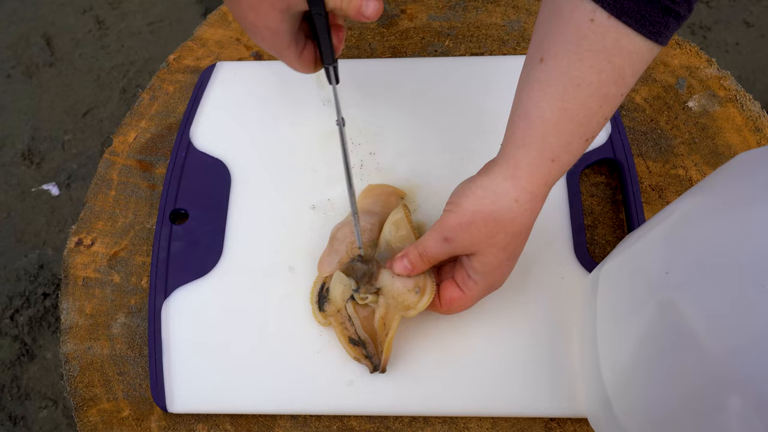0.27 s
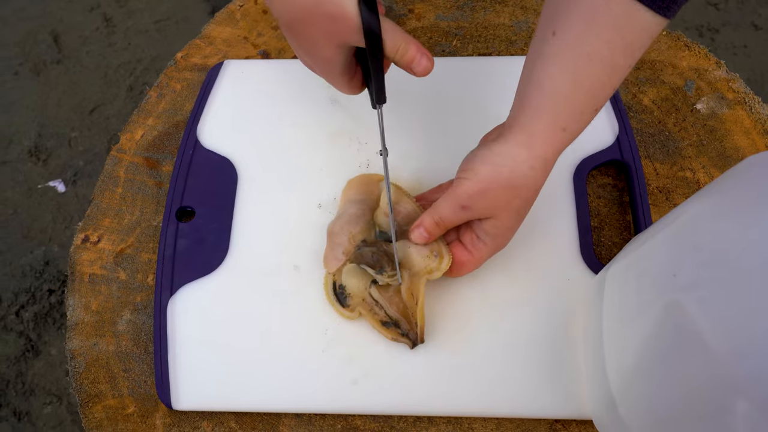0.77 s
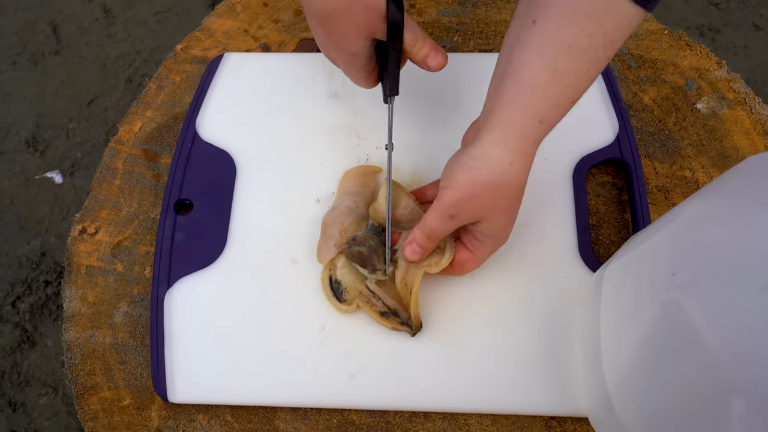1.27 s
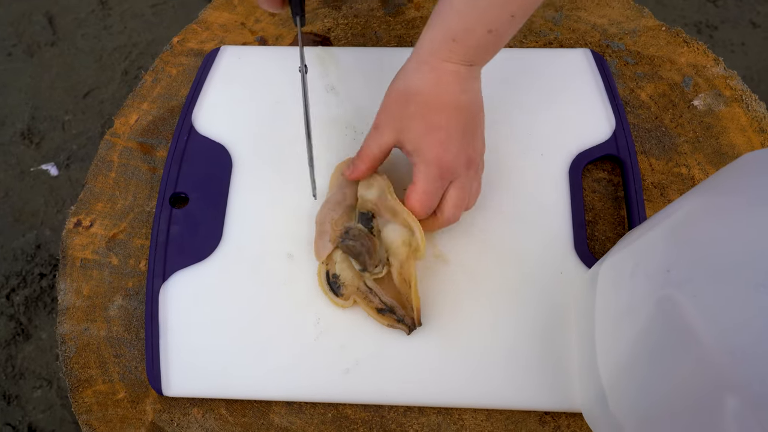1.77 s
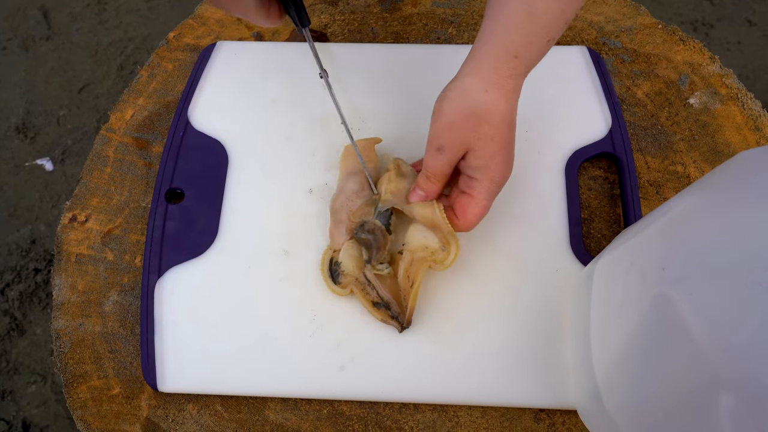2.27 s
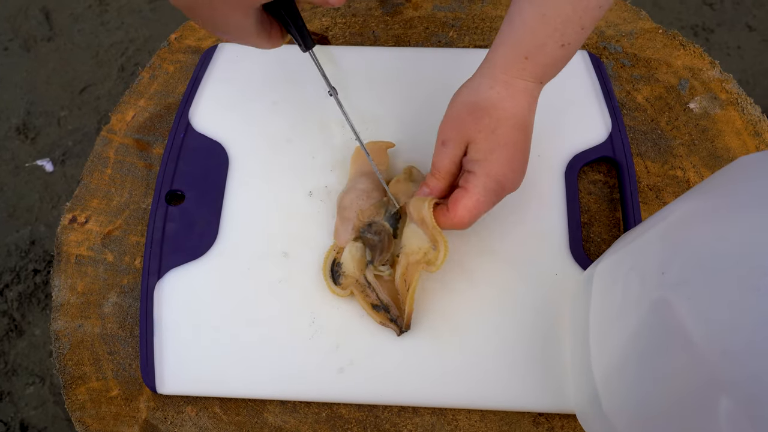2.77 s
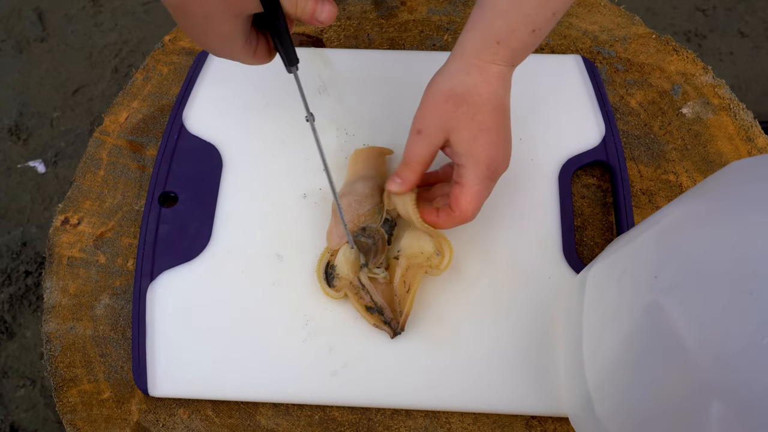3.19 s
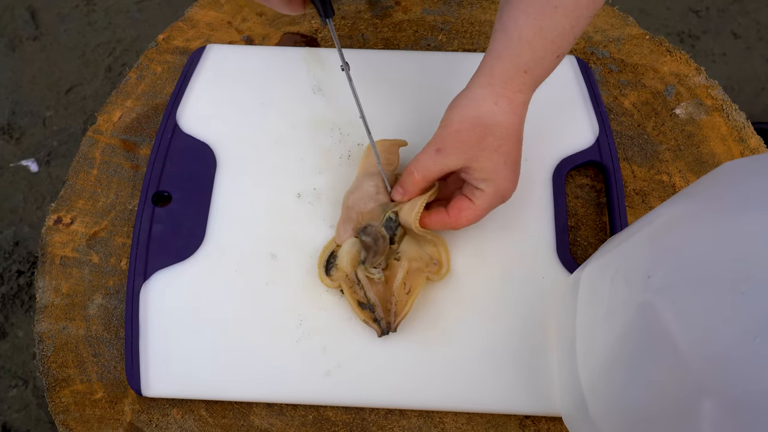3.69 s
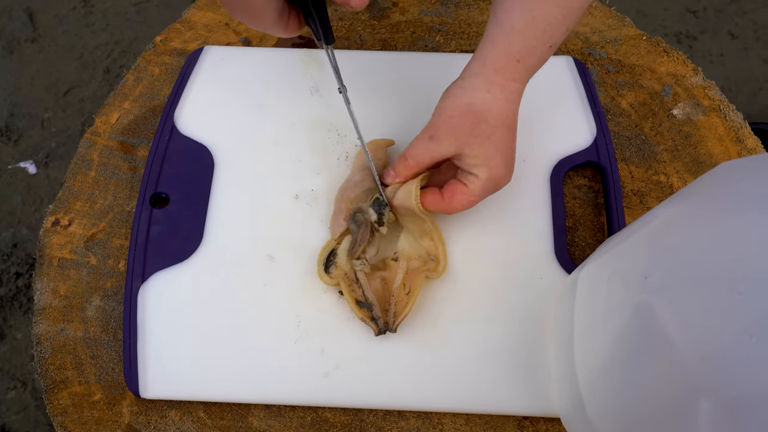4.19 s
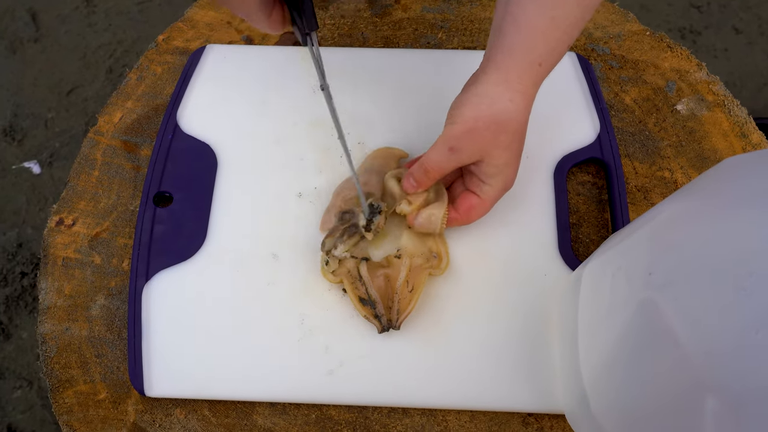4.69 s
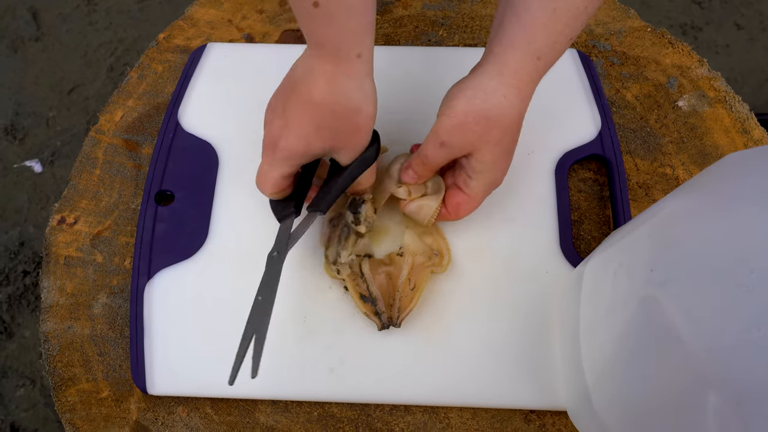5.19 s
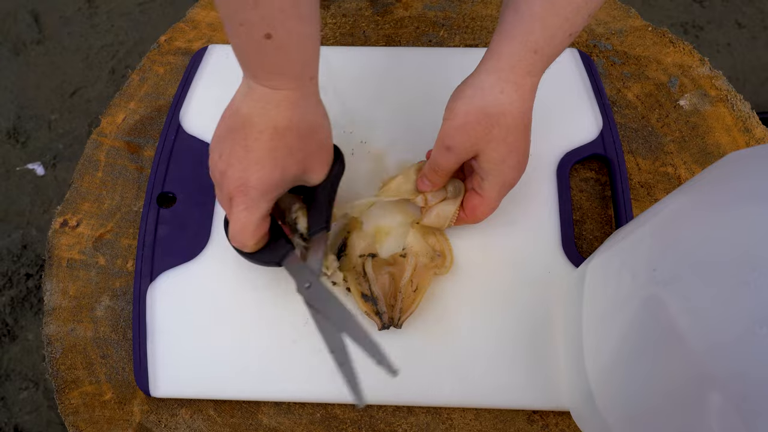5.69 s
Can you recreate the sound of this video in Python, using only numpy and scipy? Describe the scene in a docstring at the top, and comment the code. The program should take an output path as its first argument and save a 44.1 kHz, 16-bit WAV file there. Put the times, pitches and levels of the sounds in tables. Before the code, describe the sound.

Mono outdoor close-up: thin bright blade clicks, short gritty scrapes and tiny wet pops in irregular bursts, with near-quiet between them. Dull bass buffets of wind often dominate, strongest early, midway through and around four seconds. The crispest snips fall near the middle of the second half, followed by a cloth rustle and dull plastic knocks. Distant surf roars softly throughout.

```python
"""Blades grind and tick amid a few wet pops, a sleeve swishes, wind thumps dully, even surf roars far off.
Steel scissors cut shellfish flesh on a plastic board, close under a small camera on a breezy beach.
Bursts of noise through the scissors' resonances make ticks, pops and grinds; knocks are decaying tones.
The sleeve is swells of band-limited grainy noise; the surf is shaped noise with a slight drift.
Wind is bass noise that follows the gusts, plus brief low tones where it buffets the microphone."""
import sys
import numpy as np
from scipy import signal
from scipy.fft import rfft, irfft
from scipy.io import wavfile
from scipy.ndimage import uniform_filter1d

SR = 44100
rng = np.random.default_rng(int(sys.argv[2]) if len(sys.argv) > 2 else 0)


def generate_wav(signal):
    """Clip the signal to [-1, 1] and save it as 16-bit WAV at the path in sys.argv[1]."""
    frames = np.transpose(np.atleast_2d(signal))
    scaled = np.clip(frames, -1, 1) * 32767
    pcm = np.round(scaled).astype(np.int16)
    wavfile.write(sys.argv[1], SR, pcm)


N = 262174  # samples

# Distant surf, tone of the roar: (frequency [Hz], relative level [dB])
SURF_SPECTRUM = [(56, -33.5), (95, -2.5), (134, -7), (209, -13), (398, -13), (482, -16), (536, -19),
                 (858, -27), (976, -24.5), (1230, -29.5), (2150, -41), (2340, -44), (3590, -50.5),
                 (5510, -59), (15700, -57)]
SURF_DB = -50  # before its slow drift and the camera's filters

# Wind on the microphone, tone of the rumble: (frequency [Hz], relative level [dB])
WIND_SPECTRUM = [(24, -71.5), (40, -40.5), (64, -26), (89, 1.5), (114, 3.5), (170, -6), (262, -20),
                 (353, -41), (409, -34.5), (500, -44.5), (650, -71.5), (1100, -120)]
# Gusts rising out of the calm: (peak time [s], peak level [dB], rise [s], fall [s])
GUSTS = [(0.07, -35, 0.13, 0.48), (0.61, -23.5, .16, 0.15), (0.99, -38, 0.096, 0.088),
         (1.14, -26.5, 0.058, 0.04), (1.34, -38, 0.13, 0.085), (1.49, -15.5, 0.072, 0.25),
         (1.61, -25.5, 0.13, .11), (2.0, -41, 0.23, 0.077), (2.18, -40.5, 0.094, 0.21),
         (2.81, -33.5, 0.19, 0.049), (3.03, -36.5, 0.19, 0.1), (3.19, -43, 0.033, 0.24),
         (3.56, -33, 0.087, 0.093), (3.82, -32.5, 0.16, 0.24), (4.02, -15.5, 0.15, 0.15),
         (4.17, -26.5, 0.17, 0.32), (4.9, -35.5, 0.057, 0.04), (5.56, -29, 0.14, 0.12),
         (5.65, -23.5, 0.16, 0.079), (5.83, -36.5, 0.15, 0.28), (5.94, -30.5, 0.1, .1)]
CALM_DB = -52.5  # rumble between gusts
# Strongest single buffets: (middle time [s], level [dB], frequency [Hz], Gaussian half length [s])
BUFFETS = [(0.055, -24.5, 121, 0.0046), (0.086, -29, 104, 0.017), (0.171, -23, 113.6, 0.0081),
           (0.62, -17.5, 128, 0.0097), (0.656, -18, 141, 0.0029), (0.703, -24, 105, 0.011),
           (1.131, -13, 130.5, 0.0088), (1.247, -30, 105, 0.021), (1.348, -27.5, 119, 0.022),
           (1.47, -25.5, 137, 0.0042), (1.501, -13.5, 121.7, 0.0087), (1.535, -16.5, 123, 0.004),
           (1.575, -19, 142, 0.011), (1.609, -26, 131, 0.0062), (2.786, -28, 142, 0.003),
           (2.806, -26, 112.5, 0.006), (3.189, -33, 120, 0.021), (3.551, -22, 123, 0.0091),
           (3.822, -21, 130, 0.0069), (3.899, -27.5, 117, 0.015), (3.976, -26, 120.6, 0.0044),
           (4.016, -18, 138, 0.012), (4.05, -20, 127.6, 0.012), (4.073, -23.5, 120.6, 0.0054),
           (4.147, -23.5, 109.9, 0.016), (4.192, -19.5, 147, 0.003), (4.282, -26.5, 134, 0.0055),
           (4.352, -29, 123, 0.0074), (4.424, -29, 127, 0.0034), (5.563, -26.5, 127.3, 0.013),
           (5.663, -23, 107.8, 0.032), (5.9, -30, 150, 0.012)]

# Clearest ticks, close by: blade contacts and a few small wet pops: (time [s], blade ring level [dB],
# handle, pivot and tip ring levels relative to the blade ring [dB, dB, dB])
TICKS = [(0.1348, -76.5, -2, 31.5, 0), (0.335, -54, -6, -8.5, 5), (0.3498, -46, -14.7, -25, 3.5),
         (0.365, -53, -2, -6, 2.9), (0.3808, -50, -7, -7, 5), (0.6733, -68, 2.5, 7.5, -3),
         (0.8284, -67, 0, -7, -7), (0.9545, -71, 0, 3, 8), (1.1004, -70.5, -1, 7, 1),
         (1.2254, -61.5, -8, 6, 4), (1.4909, -30.5, -19, -15, -3), (1.5, -50, -6, -4, 11),
         (1.5523, -45, -21, -11, 10), (1.556, -48, -8, -8, 9), (1.6244, -64.6, -12, -9, 6),
         (1.6947, -74, -3.6, 15, 11), (1.7744, -61, 2, 0, 3), (1.8374, -69, -16, 16.5, -21),
         (1.9207, -73, 13, 11, -7.6), (1.9539, -72, -23, -18.8, -11), (2.8083, -78, 2, 21, 9),
         (2.968, -67.5, -7, -6, 7), (3.1071, -72, 1.3, -11, 0), (3.116, -58.5, 5, 10.5, -10),
         (3.4895, -53, 3, 0, -16.5), (3.5167, -53, -25, -17, 11), (3.5457, -40, -22, -19, 11.5),
         (3.5594, -52, -8.5, -5, -8), (3.5906, -56, -14, -9, 1.3), (4.081, -66, -31, 2, 1),
         (4.1254, -66.5, 5.5, -6, -4.5), (4.293, -62, -11, -6, -5), (4.319, -60, -5, 8, 11),
         (4.3553, -47.5, 1, -13, 11.5), (4.3769, -41.5, 4, 1, -7), (4.41, -57, -25, -10, 7),
         (4.421, -57, -19.5, -8, -6), (4.43, -56, -25, -11.9, -5.4), (4.4988, -58, -25, -14.1, -1),
         (4.5284, -65, -12.4, -17.4, -14), (4.5884, -45, -20, -7, 2), (4.598, -32.5, -11, 1.5, -1),
         (4.605, -48, -14, 5, 11), (4.6158, -43, -5, 1, 6), (4.6374, -67, -11.6, -4, 8),
         (5.015, -44.5, -16, -14, 2), (5.402, -68, -25, -5, 6), (5.4386, -71, -8, -13, 8),
         (5.697, -71, -18, -1, 13), (5.704, -69, -9, -1, 7), (5.7429, -70, -1, -4, 7)]
# Blades grinding past each other: (start time [s], length [s], blade ring level [dB],
# handle, pivot and tip ring levels relative to the blade ring [dB, dB, dB])
GRINDS = [(0.324, 0.029, -66, -3.5, -9, -4), (0.344, 0.029, -56, -9.5, -17, 5),
          (0.358, 0.046, -81, -2, 0, -3), (1.298, 0.11, -85, 5, -6, -8), (1.49, 0.015, -54.5, 9, 0, 7),
          (1.512, 0.018, -78, 16, 7.5, -10), (1.539, 0.028, -60, -2, -1, 5),
          (1.568, 0.041, -68.5, -0.5, -9, 6), (1.61, 0.027, -75.5, -3, -11, 5),
          (3.028, 0.03, -78, 12, 5, 4), (3.048, 0.062, -77.5, 11, 2, -8), (3.096, 0.025, -71, 5, -1, -8),
          (3.477, 0.038, -62.5, 5, -0.5, -16), (3.499, 0.026, -59, -8, -4.5, 3),
          (3.534, 0.028, -55, -4.5, -9, 2), (4.329, 0.044, -59.5, 2.5, 2.5, -4),
          (4.35, 0.081, -74, 1, 0, -10), (4.49, 0.07, -73.5, -5, -5, -10), (4.565, 0.031, -64, 4, 1, -1),
          (4.593, 0.036, -65.5, -1, -5, 9), (5.01, 0.034, -59.5, -10, -3, -2),
          (5.035, 0.021, -72, 0, 5, -18), (5.356, 0.044, -78.5, 1, 4, 2), (5.392, 0.072, -80, -13, -14, 9)]
# Resonances of each part of the scissors: (frequency [Hz], width of one pass [Hz], relative level [dB])
BLADE_RING = [(5280, 850, -4.5), (6410, 470, -1.5), (7560, 960, -5), (9000, 760, -3)]
HANDLE_RING = [(2124, 240, 0), (2360, 370, -6.5)]
PIVOT_RING = [(2810, 400, -5), (3380, 520, 0), (4050, 280, 0)]
TIP_RING = [(9960, 1100, -5), (11360, 900, -3.5), (12500, 880, -4), (14400, 2300, -4)]
TICK_RISE_S, TICK_T60_S = 0.00024, 0.0081
LINGER_DB, LINGER_S = -11, 0.02  # wet flesh and board keep fizzing after each cut
# small ticks strewn at random through every grind; levels relative to the grind
CATCH_PER_S, CATCH_DB, CATCH_SCATTER_DB = 110, -2, 3

# Sleeve and hand sweeping: (middle time [s], Gaussian half length [s], level [dB],
# centre frequency [Hz], width of one pass [Hz])
SWISHES = [(0.152, 0.026, -77, 3660, 2500), (1.57, 0.085, -66, 3380, 4000),
           (2.055, 0.096, -73.5, 2070, 1200), (5.01, 0.065, -54, 2260, 3330),
           (5.127, 0.019, -67.5, 3430, 3000), (5.167, 0.021, -58, 1150, 785),
           (5.256, 0.021, -73, 3130, 1800), (5.265, 0.024, -56.5, 1080, 790),
           (5.337, 0.12, -70.5, 1920, 2570), (5.635, 0.014, -63, 3750, 1780),
           (5.629, .07, -71.5, 2920, 3000)]

# Knocks on the board: (time [s], level before rise and decay [dB], frequency [Hz], t60 [s])
KNOCKS = [(0.673, -45, 1730, 0.0098), (3.116, -41, 1260, 0.011), (3.116, -29.5, 2690, 0.0044),
          (5.03, -39, 495, 0.1), (5.142, -28.5, 1084, 0.017), (5.143, -32, 477, 0.016),
          (5.143, -43, 2550, 0.0086), (5.238, -45, 1010, .02), (5.255, -43, 1105, 0.047)]

LOW_CUT_HZ, LOW_CUT_DB = 99.3, 19  # camera's bass cut: edge, depth
TOP_HZ = 15800  # camera's upper edge


def undb(db):
    """Turn decibels into an amplitude factor."""
    return 10 ** (np.asarray(db) / 20)


def unit(x):
    """Scale to rms 1."""
    return x / np.sqrt(np.mean(x ** 2))


def walk(rate):
    """Wander at random, rms about 1: levels held for 1 / rate seconds, then smoothed twice."""
    hold = int(SR / rate)
    steps = np.repeat(rng.standard_normal(N // hold + 1), hold)
    smooth = uniform_filter1d(uniform_filter1d(steps, hold), hold)
    return unit(smooth)[:N]


def coloured(points):
    """Make steady noise, rms 1, with levels interpolated in dB along log frequency."""
    hz, db = np.transpose(points)
    f = np.maximum(np.fft.rfftfreq(N, 1 / SR), 1)
    gain = undb(np.interp(np.log(f), np.log(hz), db))
    return unit(irfft(rfft(rng.standard_normal(N)) * gain, N))


def band(x, hz, width):
    """Pass through one resonance twice, for steep skirts."""
    b, a = signal.iirpeak(hz, hz / width, fs=SR)
    once = signal.lfilter(b, a, x)
    return signal.lfilter(b, a, once)


def ring(x, modes):
    """Ring parallel resonances, scaled so that noise roughly keeps its level."""
    power = sum(undb(db) ** 2 * np.pi * width / SR / 2 for _, width, db in modes)
    ringing = sum(undb(db) * band(x, hz, width) for hz, width, db in modes)
    return ringing / np.sqrt(power)


def add(out, s, piece):
    """Mix a piece in at s seconds, trimmed to the ends of the scene."""
    i = int(s * SR)
    piece = piece[..., max(-i, 0):N - i]
    start = max(i, 0)
    out[..., start:start + piece.shape[-1]] += piece


def surf():
    """Distant breakers: an even roar whose low and middle bands drift a little."""
    roar = coloured(SURF_SPECTRUM)
    drift = np.zeros(N)
    for hz in (200, 400, 800, 1600, 3200):
        change = undb(0.49 * walk(2.5)) - 1
        drift += change * band(roar, hz, 0.95 * hz)
    return undb(SURF_DB + 0.75 * walk(0.58)) * (roar + drift)


def gusts_db():
    """Each gust climbs from the calm and sinks again, straight in dB; the strongest one rules."""
    t = np.arange(N) / SR
    gusts = [np.interp(t, [s - rise, s, s + fall], [CALM_DB, db, CALM_DB]) for s, db, rise, fall in GUSTS]
    return np.max(gusts, axis=0)


def wind():
    """Turbulence rumbles with the gusts; each large eddy rings the microphone's bass edge briefly."""
    out = undb(gusts_db() + 0.49 * walk(30)) * coloured(WIND_SPECTRUM)
    t = np.arange(-SR // 10, SR // 10) / SR
    for (s, db, hz, half), turn in zip(BUFFETS, rng.random(len(BUFFETS))):
        swell = np.exp(-0.5 * (t / half) ** 2)
        thump = np.sin(2 * np.pi * (hz * t + turn))  # random phase
        add(out, s + t[0], undb(db) * swell * thump)
    return out


def part_gains(db, handle_db, pivot_db, tip_db):
    """Give the drive of blade, handle, pivot and tip rings as a column of amplitudes."""
    return undb([[db], [db + handle_db], [db + pivot_db], [db + tip_db]])


def scissors():
    """Ticks, wet pops and gritty stick-slip of the edges drive the rings of the four scissor parts."""
    parts = (BLADE_RING, HANDLE_RING, PIVOT_RING, TIP_RING)
    ticks, strokes = np.zeros((len(parts), N)), np.zeros((len(parts), N))

    t = np.arange(SR // 20) / SR
    fade = np.tanh(t / TICK_RISE_S) * np.exp(-np.log(1000) * t / TICK_T60_S)
    fade = fade / fade.max()
    for s, *levels in TICKS:
        add(ticks, s, part_gains(*levels) * fade)
    for s, length, *levels in GRINDS:
        stroke = signal.windows.tukey(max(int(length * SR), 16), 0.7)
        add(strokes, s, part_gains(*levels) * stroke)

    # the edges catch and slip unevenly
    when, size = rng.random(N), rng.exponential(size=N)
    catches = (when < CATCH_PER_S / SR) * undb(CATCH_DB + CATCH_SCATTER_DB * size)
    ticks = ticks + signal.fftconvolve(strokes * catches, fade[None])[:, :N]
    push = ticks + strokes * undb(1.3 * walk(400))

    keep = np.exp(-1 / (LINGER_S * SR))
    linger = signal.lfilter([1 - keep], [1, -keep], push)
    push = push + undb(LINGER_DB) * linger
    force = push * rng.standard_normal(N)  # same grit shakes every part
    return sum(ring(f, modes) for f, modes in zip(force, parts))


def sleeve():
    """Smooth swells of slightly grainy cloth noise, dull at the top."""
    out = np.zeros(N)
    grainy = rng.standard_normal(N) * undb(1.3 * walk(90))
    cloth = band(grainy, 1800, 7100)
    for s, half, db, hz, width in SWISHES:
        reach = int(4 * half * SR)
        t = np.arange(-reach, reach) / SR
        i = max(int((s + t[0]) * SR), 0)
        rustle = unit(band(np.resize(cloth[i:], len(t)), hz, width))
        swell = np.exp(-0.5 * (t / half) ** 2)
        add(out, s + t[0], undb(db) * swell * rustle)
    return out


def board():
    """Knocks on the plastic: short dull decaying tones with a soft start."""
    out, t = np.zeros(N), np.arange(int(0.1 * SR)) / SR
    for s, db, hz, t60 in KNOCKS:
        envelope = np.tanh(t / 0.00048) * np.exp(-np.log(1000) * t / t60)
        add(out, s, undb(db) * envelope * np.sin(2 * np.pi * hz * t))
    return out


def scene():
    """Mix far surf, wind at the microphone and the close cutting work into one channel."""
    return (surf() + wind() + scissors() + sleeve() + board())[None]


def record(dry):
    """The camera cuts the deep bass against wind, and the top."""
    bass_cut = signal.ellip(4, 1, LOW_CUT_DB, LOW_CUT_HZ, "high", fs=SR, output="sos")
    top_cut = signal.ellip(8, 0.2, 70, TOP_HZ, fs=SR, output="sos")
    return signal.sosfilt(top_cut, signal.sosfilt(bass_cut, dry))


dry = scene()
out = record(dry)
generate_wav(out)
```